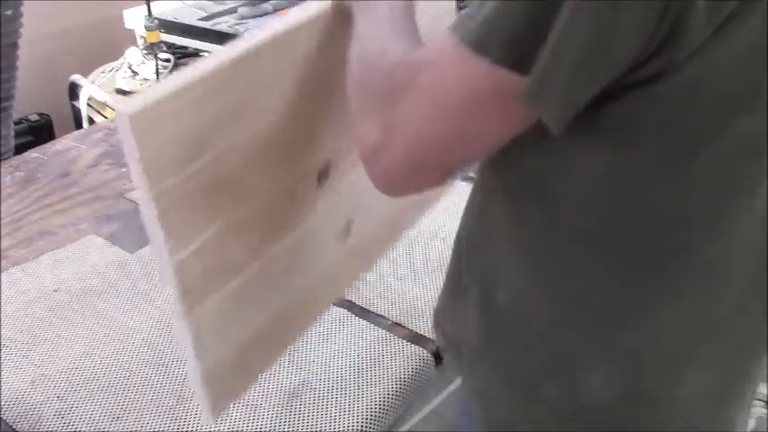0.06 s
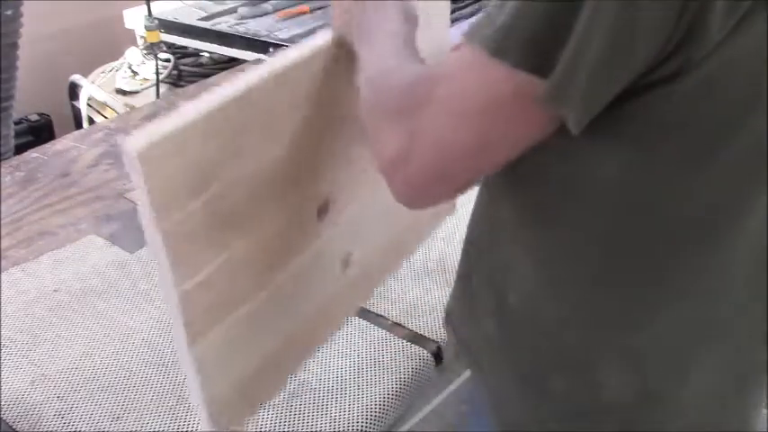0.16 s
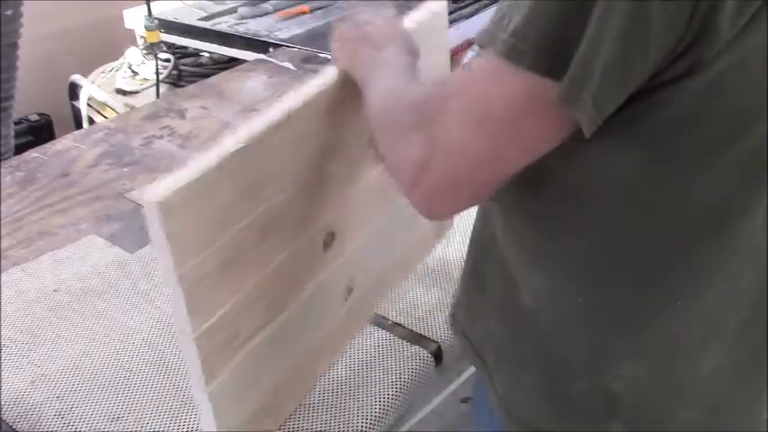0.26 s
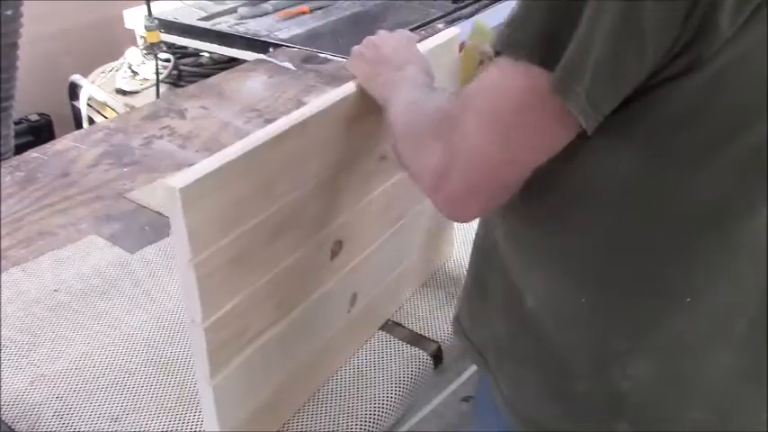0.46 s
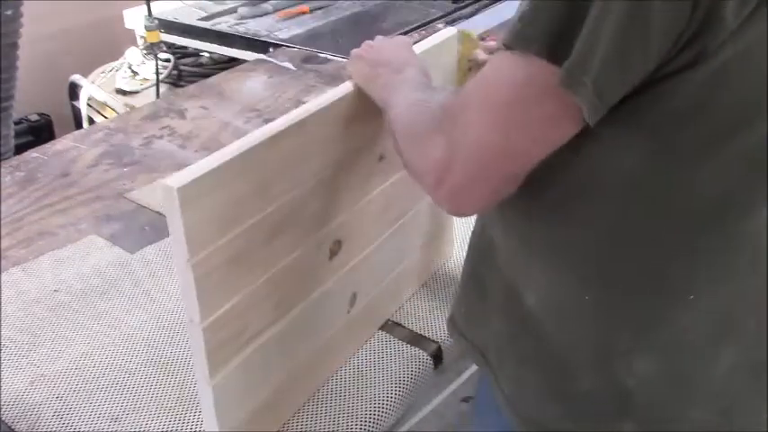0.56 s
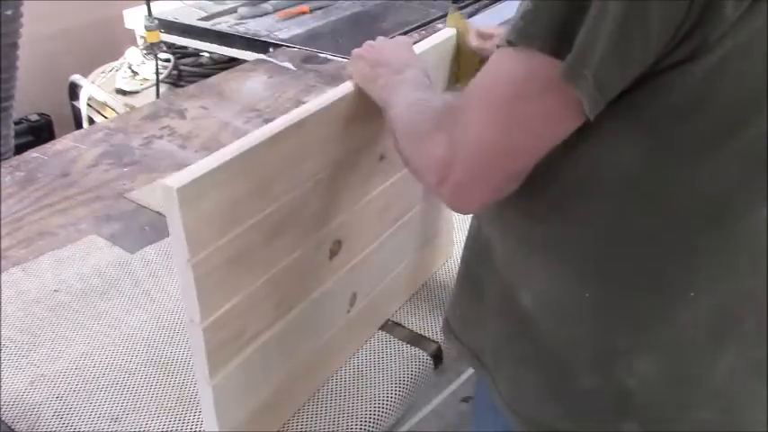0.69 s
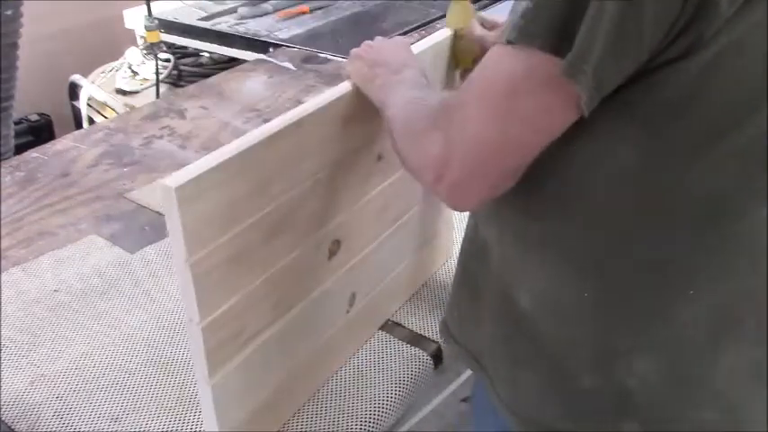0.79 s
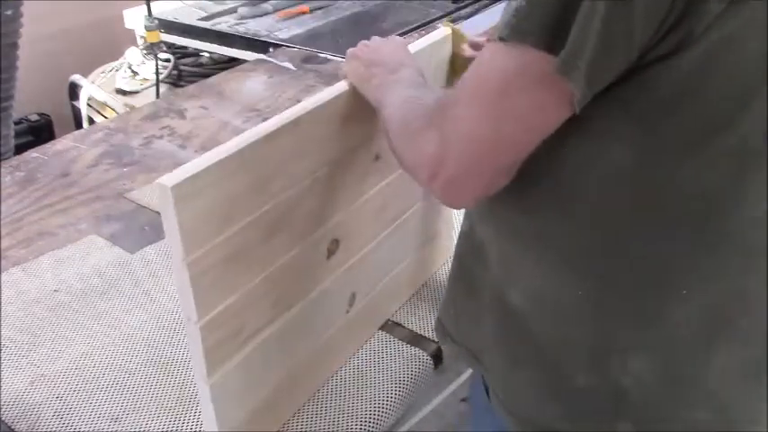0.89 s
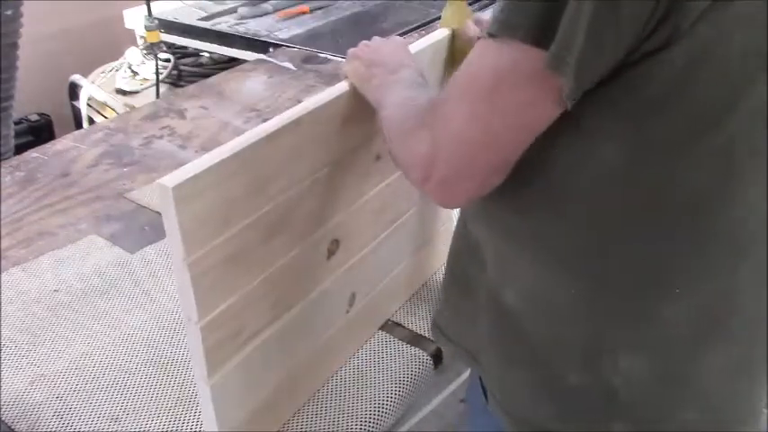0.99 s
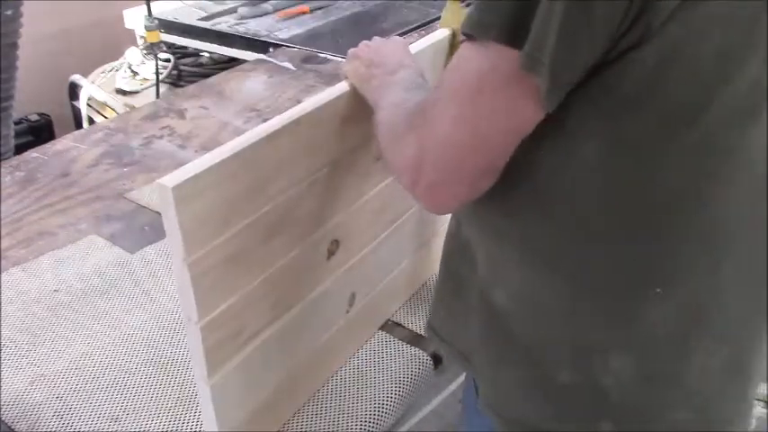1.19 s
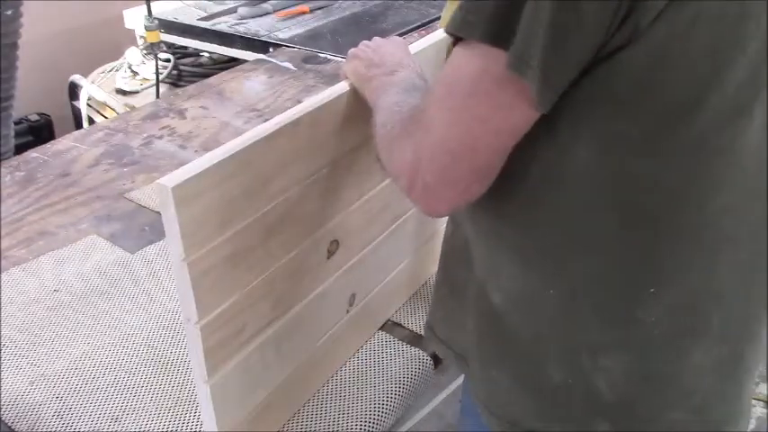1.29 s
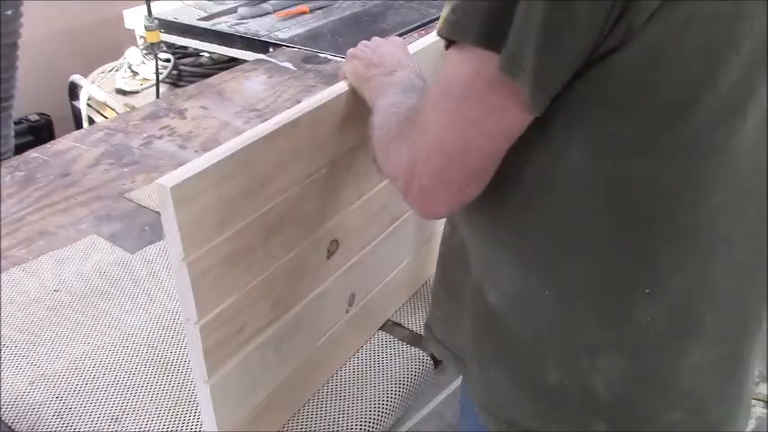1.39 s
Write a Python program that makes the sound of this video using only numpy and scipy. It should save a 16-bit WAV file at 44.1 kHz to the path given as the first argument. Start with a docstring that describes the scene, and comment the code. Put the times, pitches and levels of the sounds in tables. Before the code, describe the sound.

A wooden door panel lands on a workbench with one loud, hollow low boom and a small metallic rattle, then sandpaper rubs rapidly back and forth along its edge; close microphone in a small, lively workshop.

```python
"""Faint hum, room air and light slides on wood open the scene; a door panel then lands on a workbench and booms.
Decaying modes ring the panel and bench top, filtered noise blurs the thud, and a loose metal part rattles.
Sandpaper then rubs to and fro along the panel's edge: random grit catches hiss with hand speed and drive
the wood's resonances. A small workshop answers with a tail of noise whose decay depends on frequency.
"""
import sys
import numpy as np
from scipy import signal
from scipy.fft import rfft, irfft, next_fast_len
from scipy.io import wavfile
from scipy.ndimage import map_coordinates

SR = 44100
rng = np.random.default_rng(int(sys.argv[2]) if len(sys.argv) > 2 else 0)


def gain_from_decibels(decibels):
    """Convert decibel values to linear amplitude factors."""
    exponent = np.asarray(decibels, float) / 20
    return 10 ** exponent


def master_out(mix):
    """Clip the mix to full scale and print it as 16-bit PCM to the path in sys.argv[1]."""
    frames = np.transpose(np.atleast_2d(mix))
    ceiling = np.clip(frames, -1, 1)
    pcm = np.round(ceiling * 32767).astype(np.int16)
    wavfile.write(sys.argv[1], SR, pcm)


N = 63945
T = np.arange(N) / SR  # seconds

# Colour of the room air. Each row: frequency in Hz, relative level in dB per Hz.
AIR_COLOUR = [(20, -17), (55, -23), (80, -4.5), (150, -5), (300, -8.5), (615, -15), (900, -16), (3900, -23),
              (6700, -24), (15500, -35)]
AIR_DB = -59.5  # rms
# Likeness of left and right in the air. Each row: frequency in Hz, likeness from 0 to 1.
AIR_LIKENESS = [(60, 0.23), (300, 0.21), (3000, 0.17)]
# Wavering hum. Each row: frequency in Hz, resonance width in Hz, rms level in dB.
HUM_BANDS = [(94.5, 13, -76.5), (124.4, 14.3, -66)]

# Decay of the workshop's answer. Each row: frequency in Hz, time to fall 60 dB in s.
ROOM_T60 = [(70, 1.0), (150, 0.33), (250, 0.48), (1000, 0.48), (4000, 0.61), (12000, 0.18)]
# Colour of the answer. Each row: frequency in Hz, relative level in dB.
ROOM_COLOUR = [(70, -10), (200, -12), (400, -5), (800, 0), (15000, 0)]
# Likeness of left and right in the answer. Each row: frequency in Hz, likeness from 0 to 1.
ROOM_LIKENESS = [(60, 1), (150, 1), (300, 0.99), (500, 0.99), (800, 0.73), (1400, 0.99), (2400, 0.68),
                 (3100, 0.84), (6800, 0.2), (15000, 0.5)]
ROOM_BUILD_S = 0.02  # time constant
KNOCK_WET_DB, RATTLE_WET_DB, SAND_WET_DB = -1, -11.5, -6.5
PAN_DB = 0.5  # left raised and right lowered by this much
LOW_CUT_HZ = 50

# Light slides on the wood. Each row: start in seconds, end in seconds, level in dB,
# resonance in Hz, resonance width in Hz, share of the slide before its peak.
SLIDES = [(0.11, 0.263, -61.5, 2500, 6000, 0.84), (0.152, 0.212, -66, 1600, 300, 0.2),
          (0.191, 0.229, -55.5, 770, 120, 0.24), (0.486, 0.655, -54, 1578, 82, 0.69),
          (0.7, 0.732, -94, 1520, 150, 0.5)]

# Sanding strokes. Each row: start in seconds, end in seconds, level in dB, share of the stroke
# before its peak, emphasis of the wood ring in dB before the scaling in sanding().
STROKES = [(0.54, 0.74, -45.5, 0.71, -3), (0.762, 0.86, -43.5, 0.38, -3), (0.867, 0.987, -42.5, 0.53, -6),
           (1.01, 1.099, -43.5, .6, -1), (1.108, 1.218, -45.5, 0.43, 0.5), (1.241, 1.32, -41.5, 0.57, -2),
           (1.33, 1.447, -43.5, 0.54, -2)]
# Colour of the grit hiss. Each row: frequency in Hz, relative level in dB per Hz.
GRIT_COLOUR = [(240, -64), (400, -17), (800, -14.5), (1200, -30), (1560, -14.5), (2330, -7), (3570, -9.5),
               (5570, -7.5), (8000, -7), (11100, -14), (15500, -25.5)]
# Colour of the finest grit. Each row: frequency in Hz, relative level in dB per Hz.
FIZZ_COLOUR = [(4000, 1.5), (7000, -13), (10500, 14), (12500, 6.5), (15500, -15)]
FIZZ_DB = -4.5  # relative to the hiss at peak speed
# Resonances of the rubbed edge. Each row: frequency in Hz, width in Hz, relative level in dB.
EDGE_MODES = [(1432, 450, -3.5), (1600, 218, 3.5), (1850, 260, -3), (2640, 190, -7), (2963, 117, -4.5),
              (3170, 137, -3.5), (3520, 152, 0.5), (4700, 540, -13)]
# Panel hum under the pressing hand. Each row: frequency in Hz, resonance width in Hz, level in dB.
PANEL_BANDS = [(294.4, 49, -60.5), (805, 210, -60)]
PANEL_START_S, PANEL_RISE_S = 0.23, 0.44
LAND_S, LAND_RISE_S = 0.565, 0.115  # the paper's pressure sets in
GRIT_POWER, FIZZ_POWER, EDGE_POWER = 0.71, 1.7, 0.38  # exponents of hand speed
EDGE_BRIGHTENS = 0.57  # higher resonances follow speed more steeply
GRAINS_PER_S, GRAIN_SPREAD_DB = 15000, 1
WANDER_DB, WANDER_PER_S = 2.8, 45  # spread and knots per second of each edge resonance's level

# Chatter of the loose part. Each row: time in seconds, level in dB.
RATTLES = [(.2446, -34), (.2491, -26), (.256, -33.5), (.2636, -23), (.271, -29.5), (.308, -34.5),
           (.318, -34), (.345, -49), (.362, -42), (.425, -52), (.45, -54)]
# Modes of the metal. Each row: frequency in Hz, relative level in dB, time to fall 60 dB in s.
METAL_MODES = [(2030, -17, 0.098), (2474, -10.5, 0.045), (2550, -4, 0.047), (2600, -13, 0.038),
               (2730, -12.5, 0.078), (4070, -25.5, 0.036), (4590, -19, 0.067), (5460, -19, 0.012)]
TICK_DB, TICK_T60 = -6.5, 0.034  # relative to each contact; s

# The door lands and settles. Each row: time in seconds, level in dB.
KNOCKS = [(.2318, -7.5), (.292, -13.5), (.336, -25), (.395, -39), (.463, -30.5)]
# Modes of door and bench top. Each row: frequency in Hz, relative level in dB, time to fall 60 dB in s.
DOOR_MODES = [(66.8, -25, 0.79), (88, -22, 0.3), (124.1, -13, 0.35), (164.9, -13, 0.35), (210.5, -4, 0.23),
              (222.3, 0.5, 0.2), (246.9, -12, 0.41), (275.3, -16, 0.34), (314, -16.5, 0.34),
              (379.3, -5.5, 0.13), (436.2, -13.5, .3), (507, -21.5, 0.44), (586, -9.5, 0.067),
              (652.7, -24.5, 0.2), (747.4, -33.5, 0.15)]
KNOCK_RISE_S = 0.0029  # time constant
SOFT_DB_PER_KHZ = 3.1  # mode loss per kHz from the main boom, for each dB of weakness
# Colour of the dense upper modes. Each row: frequency in Hz, relative level in dB per Hz.
THUD_COLOUR = [(290, -26), (500, 8.5), (552, 4.5), (1390, -9.5), (2170, -17.5), (2530, -31), (3090, -22.5),
               (4670, -28), (15000, -41.5)]
THUD_DB, THUD_T60 = -30, 0.23  # level at the first knock; s
# Colour of the first contact. Each row: frequency in Hz, relative level in dB per Hz.
CRACK_COLOUR = [(2000, -23), (4500, 3), (9000, -3.5), (15000, -16)]
CRACK_DB, CRACK_T60 = -51.5, 0.23  # s


def unit(x):
    """Normalisation: a signal divided by its root mean square has rms 1."""
    return x / np.sqrt(np.mean(x ** 2) + 1e-20)


def along(points, hz):
    """Interpolation of (Hz, value) points on a logarithmic frequency axis."""
    f, v = np.transpose(points)
    return np.interp(np.log(hz + 1), np.log(f + 1), v)


def filtered(x, response):
    """Linear filtering: the spectrum is multiplied by a complex response of frequency."""
    m = next_fast_len(x.shape[-1] + SR // 4)
    spectrum = rfft(x, m) * response(np.fft.rfftfreq(m, 1 / SR))
    return irfft(spectrum, m)[..., :x.shape[-1]]


def resonant(x, peaks):
    """Modal superposition: second-order resonances (Hz, width, dB) add with alternating sign."""
    def response(f):
        total = 0
        for k, (centre, width, db) in enumerate(peaks):
            damping = 1j * f * width
            total = total + (-1) ** k * gain_from_decibels(db) * damping / (centre * centre - f * f + damping)
        return total
    return filtered(x, response)


def narrow(x, hz, width_hz):
    """Selective resonance: two passes through one mode leave a narrow band, rms 1."""
    peak = [(hz, width_hz, 0)]
    return unit(resonant(resonant(x, peak), peak))


def coloured(x, spectrum):
    """Spectral shaping: a (Hz, dB) curve weights the signal, rms 1."""
    return unit(filtered(x, lambda hz: gain_from_decibels(along(spectrum, hz))))


def widened(pair, alike):
    """Partial coherence: two unrelated signals, mixed as mid and side, share a given likeness."""
    def mid_side(hz):
        angle = np.arccos(np.clip(along(alike, hz), -1, 1)) / 2
        return np.array([np.cos(angle), np.sin(angle)])
    mid, side = filtered(pair, mid_side)
    return np.array([mid + side, mid - side])


def wobble(rate):
    """Slow random modulation: a smooth curve through random knots, rate of them a second."""
    return map_coordinates(rng.standard_normal(N // 100), [T * rate])


def struck(hits, modes, rise_s, scatter_db, soft_db):
    """Impact excitation: every hit rings the same decaying modes, at slightly different levels."""
    out = np.zeros(N)
    hz, level, t60 = np.transpose(modes)[:, :, None]
    t = T[:int(SR * t60.max())]
    decay = gain_from_decibels(level - 60 * t / t60)
    shapes = decay * np.sin(2 * np.pi * hz * t) * (1 - np.exp(-t / rise_s)) ** 2
    top_db = max(db for s, db in hits)
    for s, db in hits:
        # weaker contacts are softer: modes away from the 230 Hz boom lose level
        dull_db = soft_db * (top_db - db) * np.abs(hz[:, 0] - 230) / 1000
        mode_gain = gain_from_decibels(db - dull_db + scatter_db * rng.standard_normal(len(modes)))
        part = out[round(s * SR):][:len(t)]
        part += (mode_gain @ shapes)[:len(part)]
    return out


def bursts(hits, t60, rise_s):
    """Exponential decay: an envelope rises and dies away after each hit."""
    envelope = np.zeros(N)
    for s, db in hits:
        t = np.clip(T - s, 0, None)
        envelope += gain_from_decibels(db - 60 * t / t60) * (1 - np.exp(-t / rise_s))
    return envelope


def arch(start, end, share):
    """Reciprocating motion: hand speed from 0 up to 1 at the peak, then down to the turn."""
    phase = np.interp(T, [start, start + share * (end - start), end], [0, 0.5, 1])
    return np.abs(np.sin(np.pi * phase))


def grains():
    """Stick and slip: dense tiny catches of grit at random instants, rms 1."""
    caught = rng.random(N) < GRAINS_PER_S / SR
    spread = gain_from_decibels(GRAIN_SPREAD_DB * rng.exponential(size=N))
    return unit(caught * rng.standard_normal(N) * spread)


def background():
    """Ambient noise: partly coherent room air, and narrow noise bands heard as a wavering hum."""
    air = gain_from_decibels(AIR_DB) * widened(coloured(rng.standard_normal((2, N)), AIR_COLOUR), AIR_LIKENESS)
    hum = sum(gain_from_decibels(db) * narrow(rng.standard_normal(N), hz, w) for hz, w, db in HUM_BANDS)
    return air + hum


def shop(x):
    """Reverberation: convolution with noise in which each frequency dies at its own speed."""
    hz, t, z = signal.stft(rng.standard_normal((2, SR)), SR, nperseg=512)
    colour_db = along(ROOM_COLOUR, hz)[:, None]
    decay_db = 60 * t / along(ROOM_T60, hz)[:, None]
    build = 1 - np.exp(-t / ROOM_BUILD_S)
    tail = signal.istft(z * gain_from_decibels(colour_db - decay_db) * build, SR, nperseg=512)[1]
    tail = widened(tail / np.linalg.norm(tail[0]), ROOM_LIKENESS)
    delayed = np.pad(x, (200, 0))  # samples before the answer starts
    return signal.fftconvolve(delayed[None], tail, axes=1)[:, :N]


def slides():
    """Light friction: hand and paper rub the wood softly, in bands set by a resonance."""
    return sum(gain_from_decibels(db) * arch(a, b, share) * narrow(grains(), hz, w)
               for a, b, db, hz, w, share in SLIDES)


def sanding():
    """Friction excitation: grit hisses with hand speed and drives the wood's resonances."""
    pressure = np.clip((T - LAND_S) / LAND_RISE_S, 0, 1)

    def strokes(power, ring):
        return pressure * sum(gain_from_decibels(db + ring * wood_db) * arch(a, b, share) ** power
                              for a, b, db, share, wood_db in STROKES)

    hiss = coloured(grains(), GRIT_COLOUR) * strokes(GRIT_POWER, 0)
    fizz = gain_from_decibels(FIZZ_DB) * coloured(grains(), FIZZ_COLOUR) * strokes(FIZZ_POWER, 0)
    catches = grains()
    ring = np.zeros(N)
    for k, peak in enumerate(EDGE_MODES):
        power = EDGE_POWER * (peak[0] / EDGE_MODES[0][0]) ** EDGE_BRIGHTENS
        wander = gain_from_decibels(WANDER_DB * wobble(WANDER_PER_S))
        push = catches * strokes(power, 0.76) * wander
        ring += (-1) ** k * resonant(push, [peak])
    ring /= np.std(resonant(catches, EDGE_MODES))
    panel = sum(gain_from_decibels(db) * narrow(grains(), hz, w) for hz, w, db in PANEL_BANDS)
    panel_rise = np.clip((T - PANEL_START_S) / PANEL_RISE_S, 0, 1)
    return hiss + fizz + ring + panel * panel_rise


def rattle():
    """Repeated impact: each contact of the loose part ticks and rings the metal's modes."""
    tick_colour = [(800, 11), (2000, 15), (5500, 1), (9000, -9.5), (15000, -27)]  # Hz, dB
    tick = coloured(rng.standard_normal(N), tick_colour) * bursts(RATTLES, TICK_T60, rise_s=0.0009)
    ring = struck(RATTLES, METAL_MODES, rise_s=0.00053, scatter_db=4.0, soft_db=0)
    return ring + gain_from_decibels(TICK_DB) * tick


def knock():
    """Modal density: low panel modes boom singly, while the dense upper ones blur into a thud."""
    boom = struck(KNOCKS, DOOR_MODES, KNOCK_RISE_S, scatter_db=3, soft_db=SOFT_DB_PER_KHZ)
    first_s, first_db = KNOCKS[0]
    thud = coloured(rng.standard_normal(N), THUD_COLOUR) * bursts(KNOCKS[:3], THUD_T60, rise_s=0.011)
    crack_envelope = bursts([(first_s, CRACK_DB)], CRACK_T60, rise_s=0.0022)
    crack = coloured(rng.standard_normal(N), CRACK_COLOUR) * crack_envelope
    return boom + gain_from_decibels(THUD_DB - first_db) * thud + crack


def scene():
    """Superposition: direct sound, the room's answer and the background add."""
    blow, metal, rub = knock(), rattle(), sanding() + slides()
    low_cut = signal.butter(4, LOW_CUT_HZ, "high", fs=SR, output="sos")
    blow = signal.sosfilt(low_cut, blow)
    direct = (blow + metal + rub) * gain_from_decibels([[PAN_DB], [-PAN_DB]])
    impact_answer = shop(gain_from_decibels(KNOCK_WET_DB) * blow + gain_from_decibels(RATTLE_WET_DB) * metal)
    rub_answer = gain_from_decibels(SAND_WET_DB) * shop(rub)
    return direct + impact_answer + rub_answer + background()


def top_cut(x):
    """Nothing passes above the cut-off."""
    return signal.sosfilt(signal.butter(12, 15670, fs=SR, output="sos"), x)


def record(dry):
    """Final stage: the finished mix becomes the output signal."""
    return top_cut(dry)


dry = scene()
out = record(dry)
master_out(out)
```